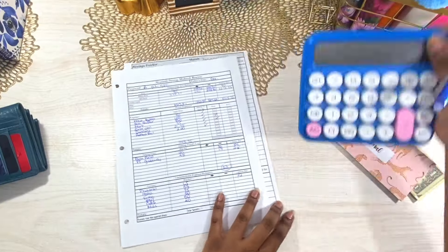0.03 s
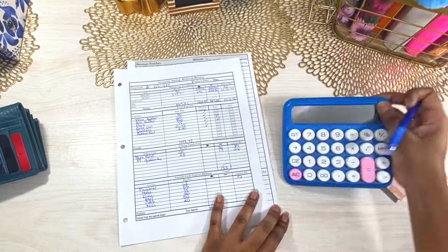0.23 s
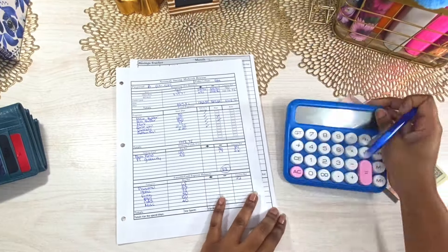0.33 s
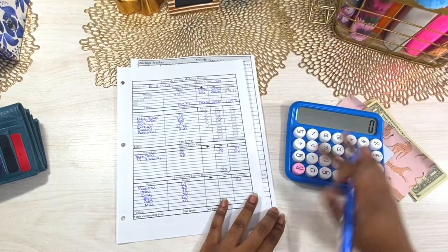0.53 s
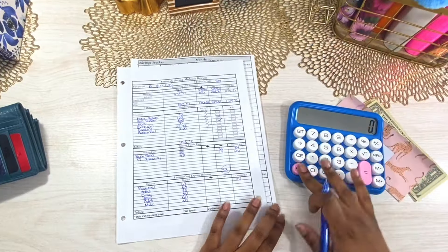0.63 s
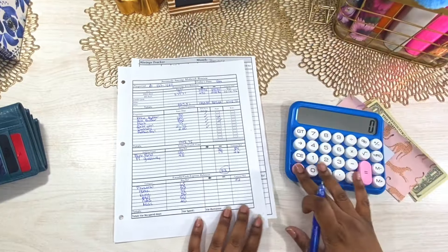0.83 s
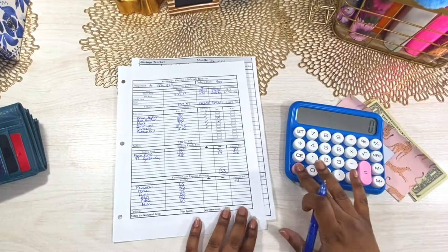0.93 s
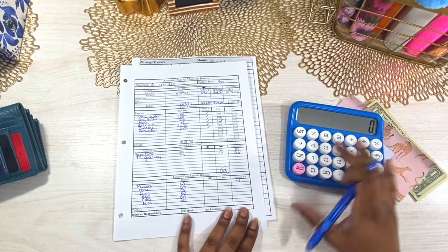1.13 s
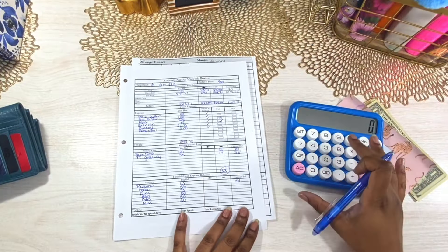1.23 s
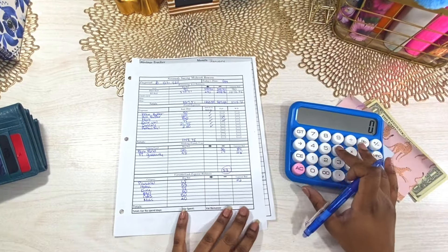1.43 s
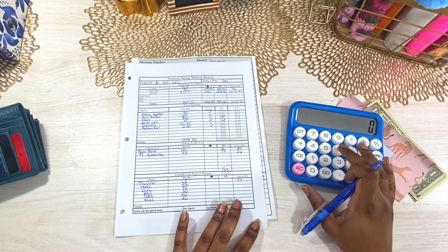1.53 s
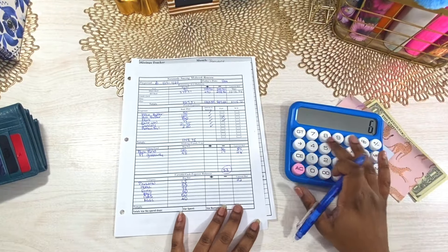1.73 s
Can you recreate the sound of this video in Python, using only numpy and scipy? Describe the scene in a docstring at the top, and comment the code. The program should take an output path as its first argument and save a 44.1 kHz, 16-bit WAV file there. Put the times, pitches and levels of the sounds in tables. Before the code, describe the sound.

A plastic calculator thumps down on a wooden desk, then its keys click.

```python
"""Calculator on a wooden desk

A plastic calculator is set down hard in two heavy thumps, its loose case rattling, then its keys are
pressed. Each push thuds the desk softly; the key springs back with a sharp click of the hollow case.
A pen in the hand buzzes briefly, hands brush over paper, and a small room rings after every blow."""
import sys
import numpy as np
from scipy import signal
from scipy.fft import rfft, irfft
from scipy.io import wavfile

SR = 44100
rng = np.random.default_rng(int(sys.argv[2]) if len(sys.argv) > 2 else 0)


def output_pcm(signal):
    """Save a mono or channel-first signal as 16-bit PCM at the path in sys.argv[1].

    Samples are clipped to [-1, 1] before scaling.
    """
    pcm = np.clip(np.atleast_2d(signal).T, -1, 1) * 32767
    wavfile.write(sys.argv[1], SR, np.round(pcm).astype(np.int16))


N = 79380
PHASE_SCATTER_RAD = 0.49  # chance phase of a ringing mode on each side


def calculator():
    """Landings, key presses and clicks excite the desk and the case; both ring into the room."""
    # edges and feet landing: start_s, thump_db, cutoff_hz, ring_factor, rattle_db, rattle_t60_s,
    # clack_db, tilt_db_per_octave, ping_db
    landings = [(0.227, -9.5, 700, 1, -17, 0.23, -10.5, 0.8, -3.5),
                (0.3681, -10, 330, .8, -16.5, 0.24, -25.5, -4.5, -15),
                (0.3831, -3.5, 260, 1.14, -19, 0.33, -11.5, -1.5, -8.5),
                (0.3891, -23.5, 300, 1.2, -19.5, 0.23, -15.5, -0.3, -8)]
    # a finger pushing a key or resting on the case: start_s, thud_db, cutoff_hz, ring_factor, rattle_db
    presses = [(0.572, -33, 95, 1.84, -65), (0.6758, -32, 345, 1.3, -56), (0.8393, -33, 360, 1.33, -52),
               (0.9609, -34.5, 379.6, 1.03, -46), (1.332, -63, 288, 0.93, -71),
               (1.6135, -40, 810, 1.12, -46.5), (1.7775, -34, 600, 0.52, -41)]
    # keys snapping back, nails and pen ticking on them:
    # start_s, click_db, tilt_db_per_octave, ping_db, thud_db, rattle_db
    clicks = [(0.5565, -54.5, 6, -10, -64, -77), (.6585, -47.5, 0, -3, -51, -75),
              (0.7409, -20, 0, -16, -33, -55), (0.8954, -29.5, -3, -13, -38, -81),
              (0.9427, -68, 5.5, 4, -69, -63), (0.98, -63, 7.5, 0, -65, -61),
              (1.0328, -22, 1.5, -2.5, -32, -60.5), (1.6152, -43.5, 1, -14.5, -62, -65.5),
              (1.666, -29.5, 2.5, -4.5, -42.5, -47), (1.7685, -46.5, 5.5, -5.5, -58, -78),
              (1.7729, -41, -6, -7, -60, -61), (1.779, -44.5, -1.5, -12.5, -69, -70)]
    # the pen buzzing in the hand: start_s, level_db, pitch_hz
    buzzes = [(1.613, -47.5, 2760), (1.6753, -31, 2380)]
    desk, case = np.zeros((2, 2, N))
    for start, thump_db, cutoff_hz, ring, rattle_db, rattle_t60, clack_db, tilt_db, ping_db in landings:
        add(desk, start, thump(thump_db, cutoff_hz, ring))
        add(desk, start, rattle(rattle_db, rattle_t60))
        add(case, start, clack(clack_db, tilt_db, ping_db))
    for start, thud_db, cutoff_hz, ring, rattle_db in presses:
        add(desk, start, thump(thud_db, cutoff_hz, ring))
        add(desk, start, rattle(rattle_db, t60_s=0.19))
    for start, click_db, tilt_db, ping_db, thud_db, rattle_db in clicks:
        add(case, start, clack(click_db, tilt_db, ping_db))
        add(desk, start, thump(thud_db, cutoff_hz=1500, ring_factor=0.85))
        add(desk, start, rattle(rattle_db, t60_s=0.18))
    for start, level_db, hz in buzzes:
        add(case, start, pen(level_db, hz))
    return desk + case + amp(-7) * room(case) + amp(-14) * room(desk)


def thump(level_db, cutoff_hz, ring_factor):
    """The desk top swells and rings; a softer blow, with a lower cutoff, reaches fewer of its modes."""
    # modes of the desk top: pitch_hz, level_db, t60_s (stretched by ring_factor)
    modes = [(54, -15.5, 0.27), (66, -4.5, 0.23), (82.4, -15, 0.37), (114.3, -2.5, 0.22), (123.47, -6, .28),
             (153.4, -23.5, 0.29), (193.2, -21.5, 0.1), (243.9, -26, .14), (305, -18.5, 0.053),
             (385.4, -16, .17), (427.6, -2.5, 0.07), (509.4, -22.5, .14)]
    rise_cycles = 0.67
    t = np.arange(SR * 3 // 4) / SR
    out = 0
    for hz, db, t60 in modes:
        swell = 1 - np.exp(-t * hz / rise_cycles)
        decay = amp(level_db + db - 60 * t / (t60 * ring_factor))
        lowpass = 1 / np.hypot(1, (hz / cutoff_hz) ** 2)
        out -= lowpass * swell * decay * np.sin(2 * np.pi * hz * t)
    return out * amp([[-0.9], [0.9]])  # slightly to the right


def clack(level_db, tilt_db, ping_db):
    """Plastic cracks on plastic for a few milliseconds and the hollow case rings briefly."""
    # spectrum of the crack: frequency_hz, level_db
    crack = [(100, -28), (620, -21), (1500, -4), (2500, 0), (5500, -4), (8000, -8.5), (12000, -8.5),
             (13500, -18.5), (16000, -16.5)]
    # modes of the case: pitch_hz, level_db, t60_s
    modes = [(414, -14.5, 0.025), (881, 0, 0.025), (1222, 1, 0.023), (1615, -6, .017), (1758, 1.5, 0.014),
             (2023, -10, 0.037), (2340, -7.5, 0.011), (2770, -9.5, 0.0094), (3320, -11, .017),
             (4200, -6, 0.0096), (5322, -12.5, .016)]
    ping = (3780, ping_db, 0.021)  # a bright mode that only some blows bring out
    rise_s, hold_s, fall_s = 0.0006, 0.0016, 0.0038
    spread_rad = np.array([[0.48], [-0.48]])
    t = np.arange(2048) / SR
    # the tilt changes the crack's level as well as its colour
    tilt_gains = amp(tilt_db * octaves(np.transpose(crack)[0]))
    crack_db = -8.5 + 10 * np.log10(np.mean(tilt_gains ** 2))
    envelope = (1 - np.exp(-t / rise_s)) * np.exp(-np.maximum(t - hold_s, 0) / fall_s)
    out = amp(crack_db) * envelope * noise(len(t), crack, tilt_db, correlation=0.3)
    for k, (hz, db, t60) in enumerate([*modes, ping]):
        phase = spread_rad * (-1) ** k + PHASE_SCATTER_RAD * rng.standard_normal((2, 1))
        swell = 1 - np.exp(-t * hz)
        decay = amp(db + tilt_db * octaves(hz) - 60 * t / t60)
        out += swell * decay * np.cos(2 * np.pi * hz * t + phase)
    return amp(level_db) * np.array([np.roll(out[0], 1), out[1]])  # the left lags by one sample


def rattle(level_db, t60_s):
    """The loose case gives a dull, irregular shudder that dies away."""
    # spectrum of the shudder: frequency_hz, level_db
    spectrum = [(40, -22.5), (150, -13.5), (225, -1.5), (300, 0.5), (410, -8), (560, -13), (720, -16.5),
                (1100, -18), (2000, -22.5), (5000, -32.5), (16000, -55)]
    rise_s = 0.003
    t = np.arange(SR // 2) / SR
    envelope = (1 - np.exp(-t / rise_s)) * amp(level_db - 60 * t / t60_s)
    return envelope * noise(len(t), spectrum, correlation=0.87)


def pen(level_db, pitch_hz):
    """One short ring of the pen's barrel."""
    rise_s, t60_s = 0.00036, 0.025
    t = np.arange(2048) / SR
    phase = PHASE_SCATTER_RAD * rng.standard_normal((2, 1))
    envelope = (1 - np.exp(-t / rise_s)) * amp(level_db - 60 * t / t60_s)
    return envelope * np.sin(2 * np.pi * pitch_hz * t + phase)


def brushes():
    """Hands and calculator slide over paper in soft strokes of grainy friction."""
    # strokes over the paper: start_s, length_s, level_db, tilt_db_per_octave
    strokes = [(-.15, 1, -52.5, -1.5), (.012, 0.015, -51, -6), (0.031, 0.076, -57, 5),
               (0.15, 0.043, -62, -23), (0.539, 0.43, -58, -1), (1.078, 0.18, -62, 5),
               (1.255, 0.14, -58.5, 5.5), (1.436, 0.084, -68, 12.5)]
    # spectrum of the friction: frequency_hz, level_db
    spectrum = [(60, -16.5), (350, 1), (600, -8.5), (1000, 5), (1600, 1), (2300, 3.5), (3100, -7.5),
                (3900, -0.5), (5200, -4.5), (7000, -10.5), (12000, -13), (13500, -23.5), (16000, -14.5)]
    grain_spectrum = [(20, -3.5), (150, 1.5), (600, -42), (2000, -78.5)]
    out = np.zeros((2, N))
    for start, length, db, tilt_db in strokes:
        swell = np.sin(np.pi * np.arange(0, length, 1 / SR) / length)
        grain = amp(0.5 * noise(N, grain_spectrum)[0])  # half a decibel of flicker
        friction = grain * noise(N, spectrum, tilt_db)
        add(out, start, amp(db) * swell * friction[:, :len(swell)])
    return out


def room(sound):
    """Dense reflections, different for each side, each band dying at its own speed."""
    # decay of the reflections: frequency_hz, t60_s
    decay_times = [(100, 0.84), (300, 0.2439), (800, 0.2956), (2000, 0.242), (5000, 0.2378), (12000, 0.26)]
    # colour of the reflections: frequency_hz, level_db
    colour = [(100, -28.5), (400, 11), (620, 0.5), (950, -4), (1500, -1.5), (2100, 5.5), (3000, 0),
              (5000, 1.5), (9000, -1), (16000, -10)]
    predelay_s, rise_s = 0.003, 0.003
    reflections = rng.choice([-1., 1.], (2, SR * 3 // 4))
    hz, t, bands = signal.stft(reflections, SR, nperseg=256)
    decay = amp(read(colour, hz)[:, None] - 60 * t / read(decay_times, hz)[:, None])
    tail = signal.istft(bands * decay, SR, nperseg=256)[1]
    tail *= np.clip((np.arange(tail.shape[1]) / SR - predelay_s) / rise_s, 0, 1)
    return signal.fftconvolve(sound, tail / np.linalg.norm(tail[0]), axes=1)[:, :N]


def air():
    """The faint, low hush of still air in the room."""
    # spectrum of the room tone: frequency_hz, level_db
    spectrum = [(20, -21.5), (35, -13), (55, -5), (120, -3.5), (200, -13), (500, -23), (1000, -22),
                (3000, -30.5), (8000, -38.5), (16000, -35.5)]
    return amp(-70.5) * noise(N, spectrum, correlation=0.7)


def noise(size, spectrum, tilt_db=0, correlation=0):
    """Stereo noise of unit level with the given spectrum, tilted per octave."""
    hz = np.fft.rfftfreq(size, 1 / SR)
    left, independent = rng.standard_normal((2, size))
    right = correlation * left + np.sqrt(1 - correlation ** 2) * independent
    colour = amp(read(spectrum, hz) + tilt_db * octaves(hz))
    out = irfft(rfft([left, right]) * colour, size)
    return out / out.std()


def octaves(hz):
    """Octaves above 2 kHz, the pivot of every tilt; flat below 500 Hz."""
    return np.log2(np.maximum(hz, 500) / 2000)


def amp(db):
    """Decibels to gain."""
    return 10 ** (np.asarray(db) / 20)


def read(points, hz):
    """Reads a table along a log-frequency axis."""
    point_hz, values = np.transpose(points)
    return np.interp(np.log(hz + 1), np.log(point_hz), values)


def add(mix, start_s, sound):
    """Mixes a stereo sound in at start_s, trimming what falls outside."""
    at = round(start_s * SR)
    sound = sound[:, max(-at, 0):]
    part = mix[:, max(at, 0):][:, :sound.shape[1]]
    part += sound[:, :part.shape[1]]


def scene():
    """The calculator, the hands and the quiet room."""
    return calculator() + brushes() + air()


def record(dry):
    """Soft overload on the heaviest peaks, then a band limit at 16.5 kHz."""
    saturated = dry / (1 + dry ** 6) ** (1 / 6)
    lowpass = signal.firwin(255, 16500, window=("kaiser", 9), fs=SR)
    return signal.oaconvolve(saturated, lowpass[None], "same")


dry = scene()
out = record(dry)
output_pcm(out)
```